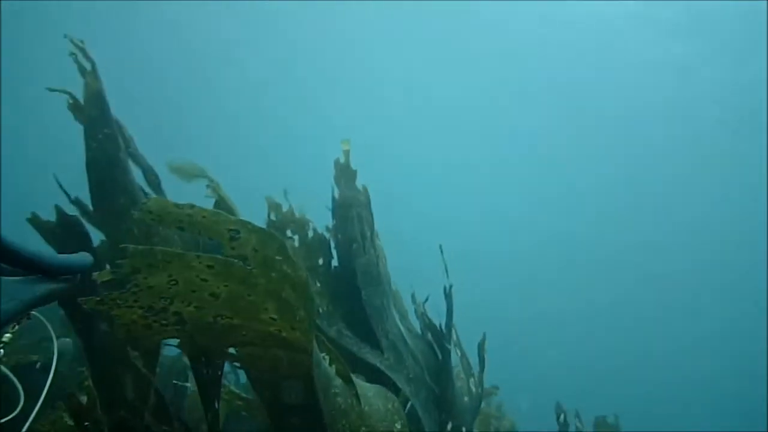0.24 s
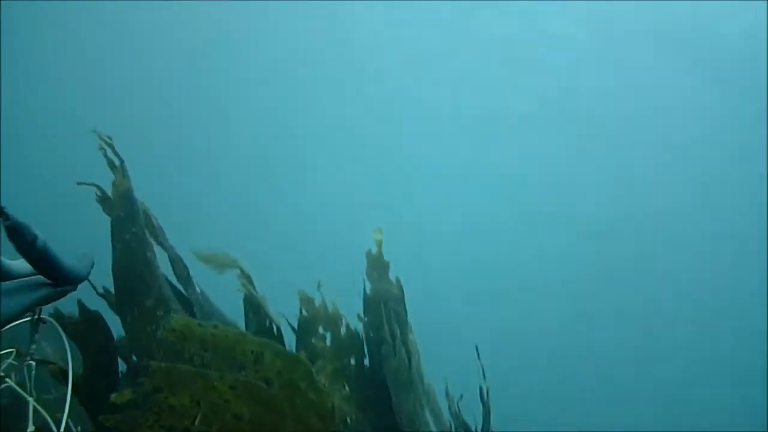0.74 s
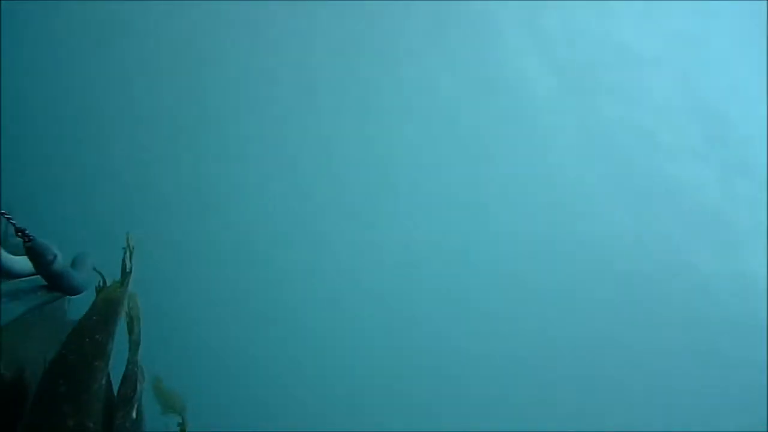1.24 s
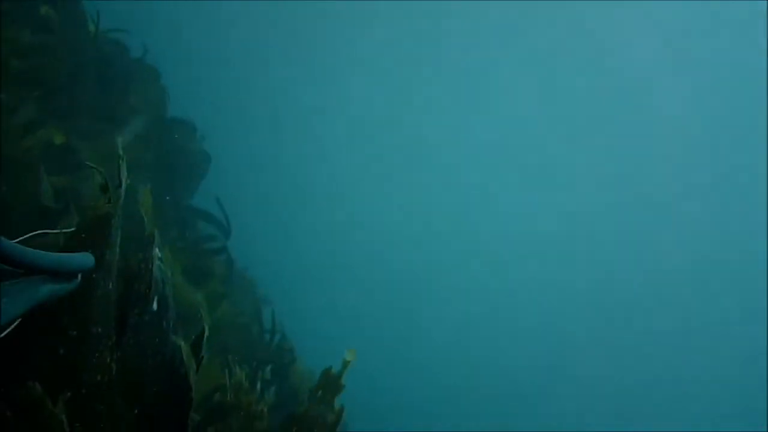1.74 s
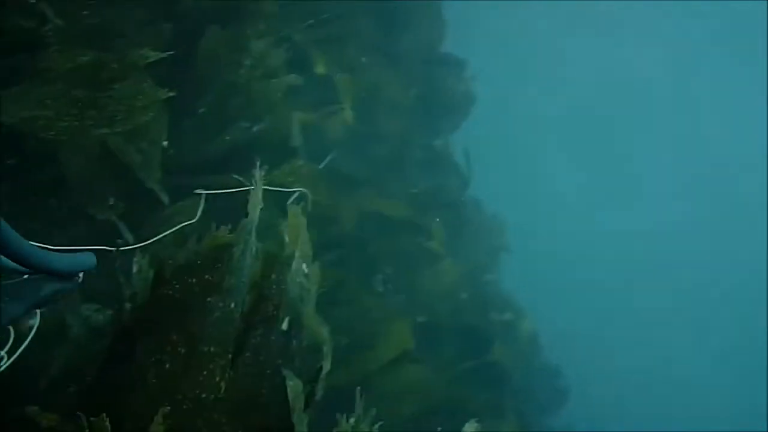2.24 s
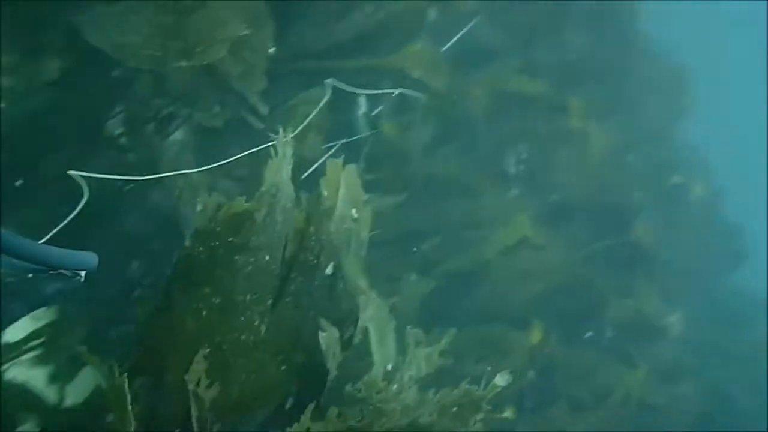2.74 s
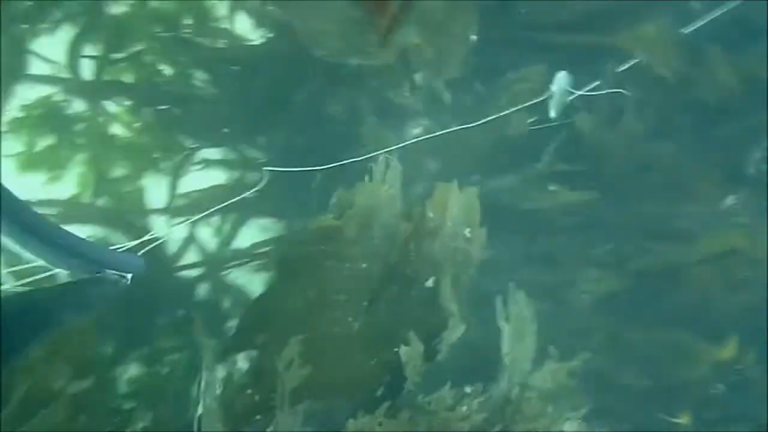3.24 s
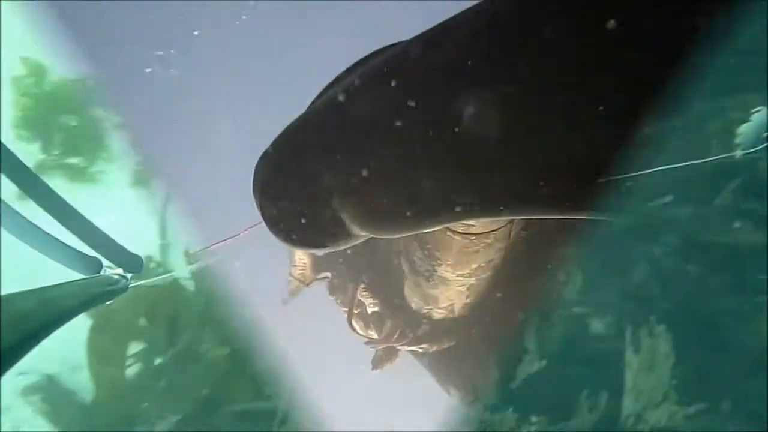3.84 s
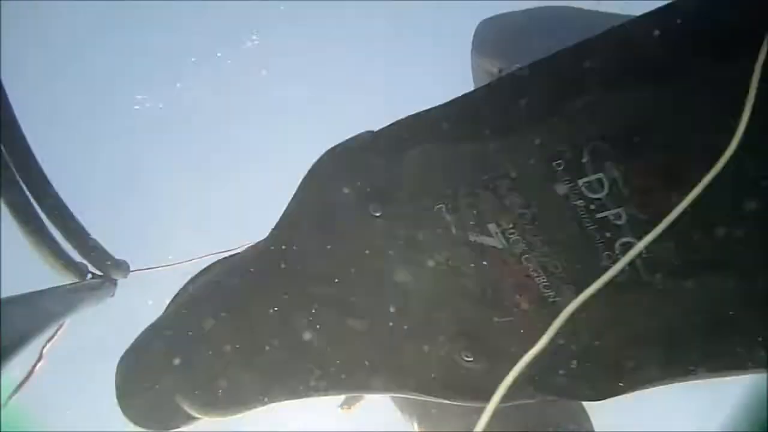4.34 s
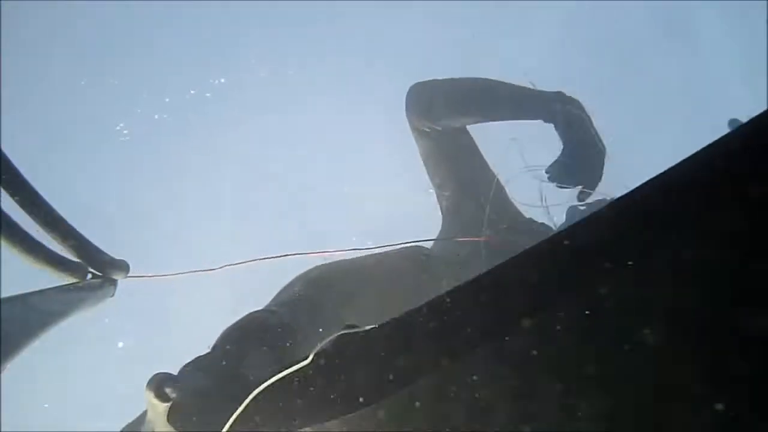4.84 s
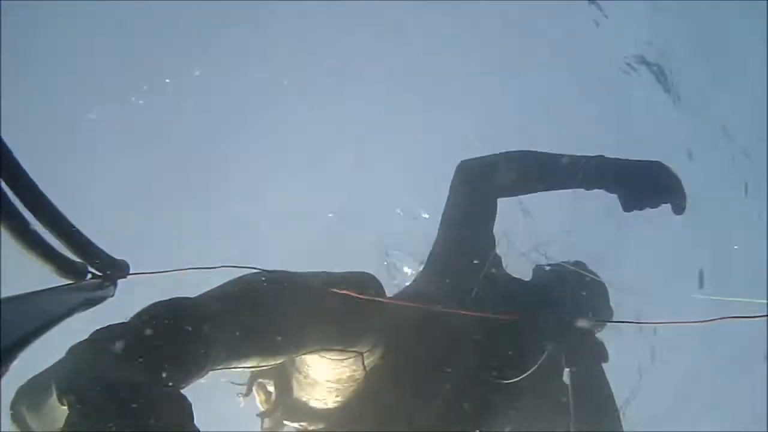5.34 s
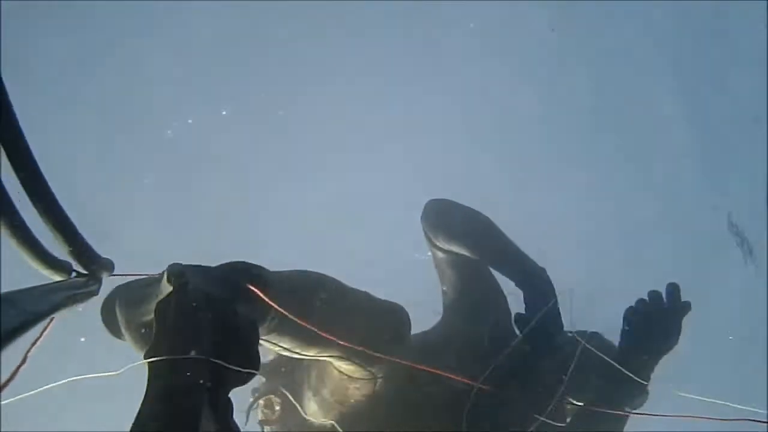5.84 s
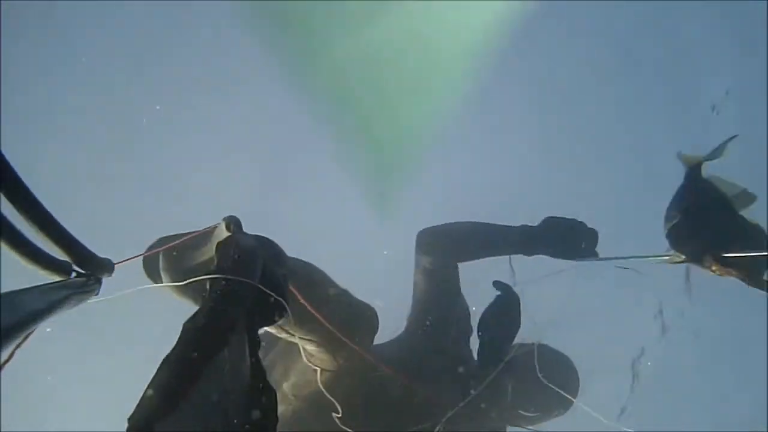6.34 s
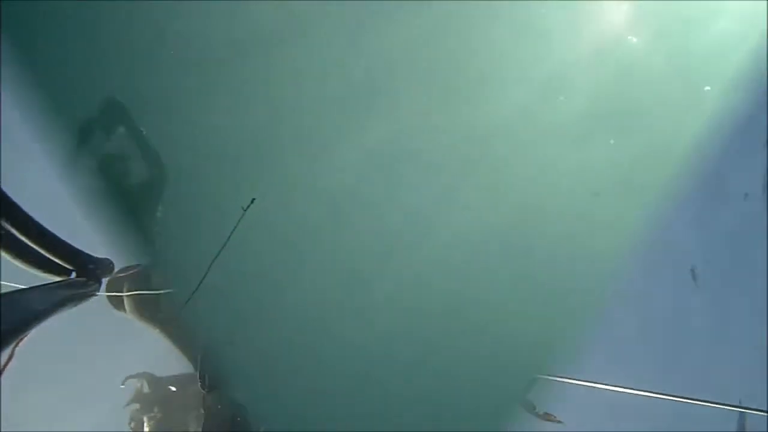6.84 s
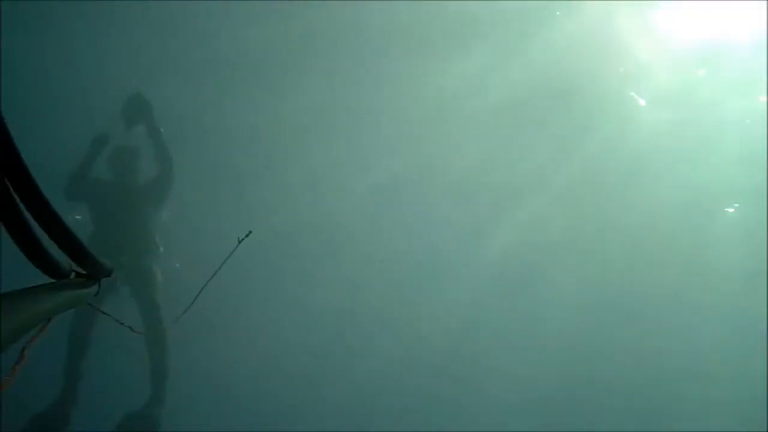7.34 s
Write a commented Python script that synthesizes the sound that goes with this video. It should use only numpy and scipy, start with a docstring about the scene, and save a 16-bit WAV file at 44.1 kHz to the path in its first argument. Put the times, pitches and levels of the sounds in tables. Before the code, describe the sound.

Close, muffled knocks and clacks of speargun gear under the sea over steady hiss, with two violent thumps and a thin line whirring at the end.

```python
"""First a low, uneven rumble of water under hiss, then rubs and hard knocks right at the microphone.
The microphone sits in the hard housing of a camera that rides on a speargun under the sea.
Gear blows push the microphone and ring the housing; light taps ring the hollow barrel.
Gear drags and a line running over a small fitting are random slips that excite ringing modes.
Water and hiss are shaped noise, the hiss stepping up during two stretches."""
import sys
import numpy as np
from scipy import signal
from scipy.io import wavfile
from scipy.ndimage import uniform_filter1d

SR = 44100
rng = np.random.default_rng(int(sys.argv[2]) if len(sys.argv) > 2 else 0)


def volts(x):
    """Linear amplitude factor 10**(x/20) for a level x in dB, scalar or array-like."""
    e = np.asarray(x, float) / 20
    return 10 ** e


def digitize_waveform(pressure):
    """Quantize a signal to 16-bit integers and store it at the path in sys.argv[1].

    Rows of a 2-D input are taken as channels; values are limited to [-1, 1].
    """
    field = np.atleast_2d(pressure).T
    bounded = np.clip(field, -1, 1)
    quanta = np.round(bounded * 32767).astype(np.int16)
    wavfile.write(sys.argv[1], SR, quanta)


N = 334233

# Mode tables list (nominal frequency [Hz], level [dB], time to fall 60 dB [s]); ring() takes a pitch factor.
# body of the housing, which rings: (nominal frequency [Hz], level [dB], nominal t60 [s])
BODY_MODES = [(305, -24, 0.14), (385.4, -3, 0.069), (496, -6, 0.046), (667, -5, 0.027)]
# thin shell of the housing, which clacks: (nominal frequency [Hz], level [dB], nominal t60 [s])
SHELL_MODES = [(1168, -3, 0.011), (1404, -1.5, 0.0099), (1940, -26, 0.014)]
# hollow barrel of the gun: (nominal frequency [Hz], level [dB], nominal t60 [s])
BARREL_MODES = [(241.9, 2.5, .13), (559, 8.5, 0.061), (464, 5.5, 0.041), (920, -4, 0.046)]
# small fitting under the line: (nominal frequency [Hz], level [dB], nominal t60 [s])
FITTING_MODES = [(438, -6.5, 0.098), (1840, 6.5, 0.025), (1907, 3.5, 0.025), (1090, -6, 0.023),
                 (541, -6, 0.067)]


def evened(x):
    """Scales to rms 1."""
    return x / np.sqrt(np.mean(x ** 2) + 1e-20)


def add(mix, s, sound):
    """Mixes a sound in at s seconds."""
    part = mix[round(s * SR):][:len(sound)]
    part += sound[:len(part)]


def ring(modes, factor=0.97, seconds=.5):
    """Answer of a set of modes to one sharp click: decaying sines at the nominal frequencies times factor."""
    t = np.arange(round(seconds * SR)) / SR
    return sum(volts(db - 60 * t / t60) * np.sin(2 * np.pi * hz * factor * t) for hz, db, t60 in modes)


def contact(ms):
    """Bell-shaped force of a blow, about ms milliseconds long, peak about 1."""
    return np.hanning(max(round(ms * SR / 1000), 1) + 2)[1:-1]


def above(x, hz):
    """Small objects radiate little below their lowest mode: a high-pass."""
    return signal.sosfilt(signal.butter(2, hz, "highpass", fs=SR, output="sos"), x)


def knocks():
    """Each blow pushes the microphone directly and rebounds; a longer contact dulls the body ring and port."""
    # blows on the housing: (time [s], signed push [full scale], contact [ms], ring [dB], clack [dB])
    blows = [(1.16, .011, 0.49, -15, 4.5), (1.1853, -0.086, 1.16, -4, -19), (1.1935, 0.32, 0.81, -20, -21),
             (1.275, .012, .14, -20, 0), (1.293, .015, .46, -18, 3), (1.307, .025, 0.54, -3, 6),
             (1.518, .006, 1.2, 2, 3), (2.0359, -0.035, 0.13, -4, -5), (2.0419, 0.17, .07, -8, -8),
             (2.047, -1.35, 1.21, -20, -5.5), (2.049, 0.81, 2.87, -21, -29), (2.05, -0.47, 0.21, -33, -17),
             (2.0514, -0.52, 1.23, -27, -3.5), (2.0632, -0.97, 0.81, -17, 1), (2.072, -0.043, 38, -30, -42),
             (2.0745, -0.01, 1.7, 1, -30), (3.1872, -0.064, 0.45, 1, 0.5), (3.2168, -0.039, 0.45, -16, -3),
             (3.218, 0.14, 0.96, -3, -8), (3.23, -0.16, 1.04, 1.5, -9), (3.2342, -0.14, .5, -5, 0),
             (3.2356, 0.33, 0.76, -6, -19), (3.236, -0.28, 0.42, -18.5, 5.5), (4.417, .004, .9, -20, 10),
             (4.548, .004, 0.98, -20, 9.5), (4.592, .005, 0.82, -4, 7.5), (5.6046, -.17, 0.74, 1, -8),
             (5.6135, 0.25, 7.2, -20, -20), (5.6175, 0.036, 0.22, -20, -10), (5.619, -0.33, 5.2, -12, -23),
             (5.6242, -0.33, 5.2, -18, -24), (5.6295, 0.93, 1.8, -13, -6), (5.635, -0.35, 4.4, -11, -28),
             (5.6556, -0.12, .91, -17, -14), (5.6657, -0.61, 2.2, -14, -18.5),
             (5.679, -0.32, 1.35, -22, -23), (5.6961, 0.04, 1.6, 7, -18), (5.7129, -0.048, 1.3, 5.5, -22)]
    # pitch of the housing ring in each stretch: (from [s], pitch factor)
    pitches = [(0, 1.1), (1.9, 1), (3.1, 0.97), (3.2, 1.42), (4.0, 0.78), (5.5, 0.95)]
    # thud of the housing, driven by the momentum: (nominal frequency [Hz], level [dB], t60 [s])
    thud_modes = [(139, -28.5, 0.03), (175, -29, 0.12)]
    # glass port, reached by the sharpest contacts: (nominal frequency [Hz], level [dB], t60 [s])
    port_modes = [(2500, -4, 0.0041), (3930, -12, 0.0077), (5200, -2, 0.0019), (7300, -18, 0.018),
                  (9400, -4, 0.0063)]
    rebound, soft_ms = 0.98, 2.6  # share of momentum sprung back, less for contacts longer than soft_ms
    rebound_ms = 4.1  # extra length of the spring-back for a push of 1
    shell_follows = 0.56  # share of the pitch shift in the shell
    grit_db, grit_from = -17, .85  # blows pushing harder than grit_from crack at first touch
    out = np.zeros(N)
    port = ring(port_modes, seconds=.05)
    grit = contact(.13)
    for s, push, ms, ring_db, clack_db in blows:
        pitch = [factor for start, factor in pitches if start <= s][-1]
        force = contact(ms)
        unit_force = force / force.sum()
        add(out, s, push * force)

        back = contact(ms + rebound_ms * abs(push))
        returned = rebound * np.exp(-(ms / soft_ms) ** 2)
        add(out, s + ms / 2000, -push * returned * back * force.sum() / back.sum())

        thud = signal.fftconvolve(ring(thud_modes, pitch, .2), force * 1000 / SR)
        add(out, s, -push * thud)
        body = signal.fftconvolve(ring(BODY_MODES, pitch, .2), unit_force)
        add(out, s, push * volts(ring_db) * body)

        edge = contact(min(ms * .5, .4))  # the shell clacks at the first touch
        shell = ring(SHELL_MODES, 1 + shell_follows * (pitch - 1), .06)
        add(out, s, -push * volts(clack_db) * np.convolve(shell, edge / edge.sum()))

        add(out, s, push * np.convolve(port, unit_force))
        if abs(push) > grit_from:
            add(out, s, -push * volts(grit_db) * np.convolve(port, grit / grit.sum()))
    return out


def gun_flex():
    """The whole gun flexes after some blows, one slow mode at a time."""
    # flexing of the gun: (time [s], level [dB], mode name)
    flexes = [(1.196, -23, "sway"), (2.068, -31, "low"), (3.238, -39.5, "long"), (3.931, -49, "long"),
              (5.619, -11.5, "low"), (5.668, -27, "low"), (5.72, -35.5, "long")]
    # modes of the whole gun by name: (nominal frequency [Hz], t60 [s])
    gun_modes = {"sway": (18, 0.18), "low": (68, 0.16), "long": (87, .75)}
    out = np.zeros(N)
    swing = contact(8.3)  # the long gun takes a moment to start moving
    for s, db, mode in flexes:
        hz, t60 = gun_modes[mode]
        bend = ring([(hz, db, t60)], seconds=.8)
        add(out, s, signal.fftconvolve(bend, swing / swing.sum()))
    return out


def taps(rows, modes, ms):
    """Light touches that chatter a little: the first mode always rings, the upper ones as listed per touch."""
    out, soft = np.zeros(N), contact(ms)
    for (s, db, upper_db), chance in zip(rows, rng.random((len(rows), 7))):
        detune = 1 + 0.049 * (chance[0] - .5)
        touches = np.zeros(round(.04 * SR))
        touches[0] = 1
        after = 0.002 + .03 * chance[1:4]  # three smaller touches, seconds after the first
        place = np.minimum(after * SR, len(touches) - 1).astype(int)
        touches[place] = .45 * np.exp(-after / .025) * (1.5 * chance[4:] - .5)

        sound = ring(modes[:1], detune, .2) + volts(upper_db) * ring(modes[1:], detune, .2)
        sound = np.convolve(sound, soft)
        sound = sound * -np.expm1(-np.arange(len(sound)) / (ms * SR / 1000))  # gentle onset
        add(out, s, volts(db) * signal.fftconvolve(sound / abs(sound).max(), touches))
    return above(out, 0.81 * modes[0][0])


def barrel_taps():
    """Light taps ring the hollow barrel."""
    # taps: (time [s], peak level before chatter and high-pass [dB], upper modes [dB])
    barrel_touches = [(1.281, -32.5, -22), (1.311, -29.5, -4), (1.344, -32, -35), (1.41, -42.5, -16),
                      (1.517, -45, -7.5), (1.7, -44, -18), (1.888, -49, -13), (1.982, -48, -3),
                      (2.086, -34, -20), (2.312, -41, 2), (3.613, -38.5, -8), (3.917, -23, -10),
                      (3.959, -42, -10), (4.001, -40.5, -16), (4.149, -29.5, -5), (4.299, -35, -16),
                      (4.318, -24, -5), (4.338, -41, -7), (4.581, -42, 4), (4.997, -31, -12.5),
                      (5.277, -37, -9), (6.029, -43, -18), (6.127, -35.5, -15), (6.463, -31, -15),
                      (6.898, -40, -24), (7.33, -35.5, -14)]
    return taps(barrel_touches, BARREL_MODES, 0.97)


def line_snags():
    """The line snags on the small fitting and rings it."""
    # snags: (time [s], peak level before chatter and high-pass [dB], upper modes [dB])
    snag_touches = [(6.438, -31, -15), (6.542, -22.5, 2), (6.553, -46, -31), (6.628, -35, -13),
                    (6.66, -44, -8), (6.973, -30, 16), (6.998, -36, -16), (7.05, -46, -2)]
    return taps(snag_touches, FITTING_MODES, 0.63)


def scrape(s, db, modes, per_s, spread_db, ms):
    """Stick-slip: random slips of uneven size into a set of modes, under the stroke."""
    t = np.arange(s[0], s[-1], 1 / SR)
    when, size, sign = rng.random((len(t), 3)).T
    slips = (when < per_s / SR) * volts(-spread_db * np.log(size + 0.022)) * np.sign(sign - .5)
    answer = np.convolve(ring(modes, seconds=.15), contact(ms))
    sound = above(signal.fftconvolve(slips, answer)[:len(t)], 0.9 * min(modes)[0])
    stroke = volts(np.interp(t, s, db)) * signal.windows.tukey(len(t), .05)
    out = np.zeros(N)
    add(out, s[0], evened(sound) * stroke)
    return out


def rubbing():
    """Rubbing on the gear excites the shell, here higher and longer ringing, and the barrel."""
    # rubbing: (time [s], high rasp [dB], low rub [dB])
    rub_strokes = [(1.13, -66, -55), (1.156, -64, -52), (1.18, -48, -47), (1.23, -59, -51),
                   (1.265, -49, -50), (1.29, -48, -43), (1.301, -58, -65), (1.312, -41, -42),
                   (1.35, -57, -47.5), (1.4, -76, -64)]
    s, rasp_db, rub_db = np.transpose(rub_strokes)
    rasp_modes = [(hz * 1.115, db, t60 * 1.3) for hz, db, t60 in SHELL_MODES[:2]]
    rasp = scrape(s, rasp_db, rasp_modes, 800, 2.6, 0.57)
    return rasp + scrape(s, rub_db, BARREL_MODES[:2], 600, 2.9, 0.41)


def running_line():
    """The running line sings in the fitting: a high whirr over a sparser low rub."""
    # running line: (time [s], whirr [dB], low rub [dB])
    line_strokes = [(6.58, -67, -62), (6.7, -56.5, -65), (6.75, -50, -67), (6.85, -47, -66),
                    (6.98, -55, -54), (7.12, -53.5, -65), (7.21, -59, -66), (7.3, -54.5, -58.5),
                    (7.48, -57.5, -61), (7.54, -73, -64)]
    s, whirr_db, rub_db = np.transpose(line_strokes)
    whirr_modes = [(hz, db, t60 * 0.86) for hz, db, t60 in FITTING_MODES[1:3]]
    whirr = scrape(s, whirr_db, whirr_modes, 550, 1.3, 0.33)
    return whirr + scrape(s, rub_db, FITTING_MODES[:1], 90, 2.6, 0.96)


def dragging():
    """Gear drags over the housing around the last blows: slips in the body and a fainter shell rattle."""
    # drag: (time [s], level [dB])
    drag_stroke = [(5.598, -31), (5.606, -14.5), (5.616, -25), (5.645, -21.5), (5.661, -29), (5.674, -19),
                   (5.7, -27.5), (5.731, -44), (5.76, -60)]
    rattle_db = -21.5  # share of the drag that reaches the shell
    s, db = np.transpose(drag_stroke)
    scraping = scrape(s, db, BODY_MODES[1:3], 320, 2.6, 1.07)
    return scraping + scrape(s, db + rattle_db, BODY_MODES[3:] + SHELL_MODES, 500, 1.6, 0.58)


def surge():
    """Low, uneven rumble of water: bass noise that wanders in level and swells around movements."""
    # swells around a movement: (time [s], level [dB])
    stirs = [(.45, -67), (1.2, -62), (2.07, -55), (3.4, -61), (5.7, -56)]
    surge_db, wander_db, stir_db_per_s = -65.5, 1.5, 55  # resting level, rms wander, slope of each swell
    band = signal.butter(2, [12, 140], "bandpass", fs=SR, output="sos")
    low = signal.sosfilt(band, rng.standard_normal(N))
    t = np.arange(N) / SR
    rates = np.geomspace(.3, 3, num=12)  # Hz
    wander = evened(sum(np.sin(2 * np.pi * (f * t + rng.random())) / np.sqrt(f) for f in rates))
    stirred = sum(volts(db - stir_db_per_s * abs(t - s)) for s, db in stirs)
    return evened(low) * (volts(surge_db + wander_db * wander) + stirred)


def hiss():
    """Smooth microphone noise, stronger toward the bass, with slightly lumpy low water movement."""
    # colour of the hiss: (frequency [Hz], relative level [dB])
    colour = [(12, 1.5), (25, 8), (49, -6), (200, -7.5), (499, -9), (923, -14), (1060, -13.5), (1260, -15),
              (2260, -18), (6180, -23.5), (14300, -25), (16000, -34.5)]
    # stretches where the hiss steps up: (from [s], to [s])
    louder = [(3.175, 4.6), (6.05, 7.5)]
    hiss_db, step_db, step_s = -52.5, 3.5, .045  # rms level, rise in the louder stretches, ramp time
    frames, hz = N // 256 + 5, np.fft.rfftfreq(1024, 1 / SR)
    real, imaginary, lumps = rng.standard_normal((frames, 513, 3)).T
    lumps = uniform_filter1d(lumps, size=16, axis=0)  # smooth over frequency, then over time
    lumps = evened(uniform_filter1d(lumps, size=10, axis=1))
    f, db = np.transpose(colour)
    colour_db = np.interp(np.log(hz + 1), np.log(f + 1), db)[:, None]
    lumpy_db = 1.3 / (1 + hz / 500)[:, None] * lumps
    spectrum = (real + 1j * imaginary) * volts(colour_db + lumpy_db)
    noise = signal.istft(spectrum, nperseg=1024, noverlap=768)[1][:N]
    t = np.arange(N) / SR
    up = sum(np.clip(np.minimum(t - start, end - t) / step_s + .5, 0, 1) for start, end in louder)
    return evened(noise) * volts(hiss_db + step_db * up)


def scene():
    """All gear sounds, the water and the hiss, in one channel."""
    blows = knocks() + gun_flex()
    touches = barrel_taps() + line_snags()
    scrapes = rubbing() + running_line() + dragging()
    return (blows + touches + scrapes + surge() + hiss())[None]


def top_cut(x):
    """Nothing passes above the cut-off."""
    return signal.sosfilt(signal.butter(12, 16500, fs=SR, output="sos"), x)


def record(dry):
    """The input blocks steady pressure, adds a small constant offset and overloads on the hardest blows."""
    coupled = signal.lfilter(*signal.butter(1, 14, "highpass", fs=SR), dry)
    offset = -0.0013  # of full scale
    return top_cut(np.clip(coupled + offset, -1, 1))


dry = scene()
out = record(dry)
digitize_waveform(out)
```